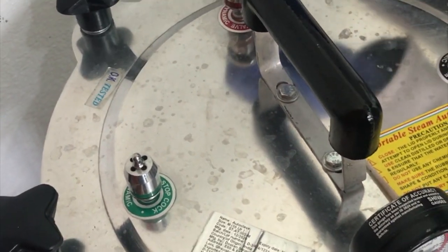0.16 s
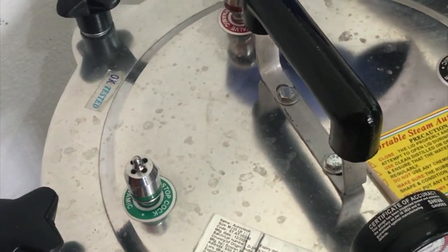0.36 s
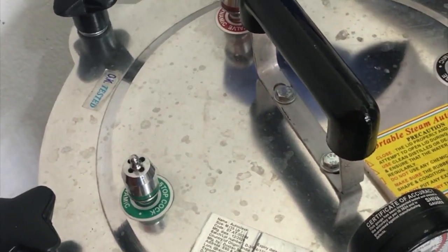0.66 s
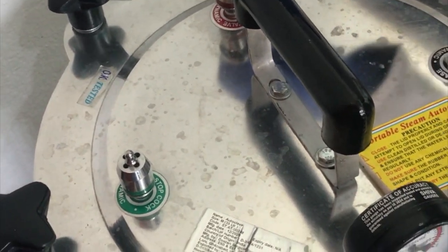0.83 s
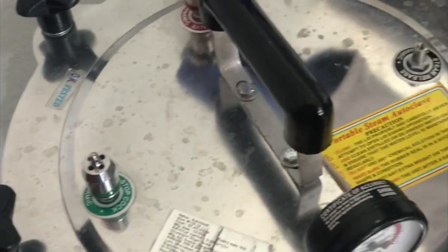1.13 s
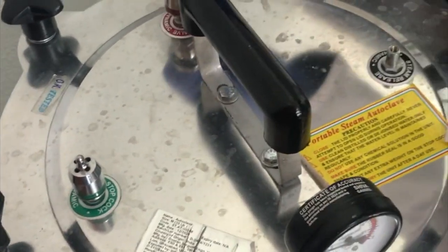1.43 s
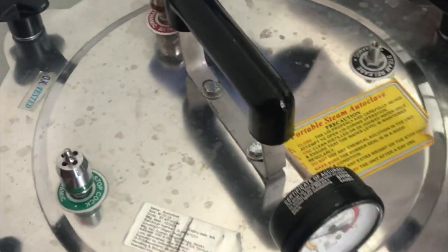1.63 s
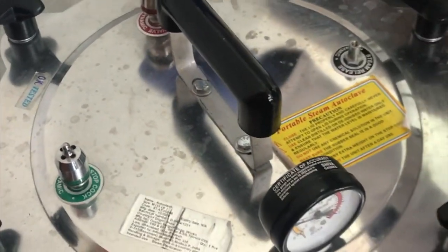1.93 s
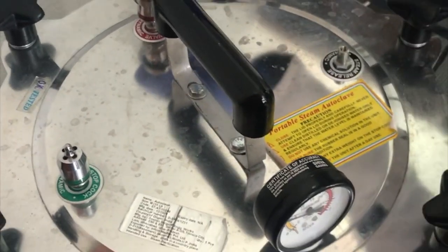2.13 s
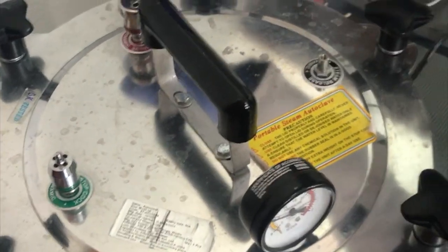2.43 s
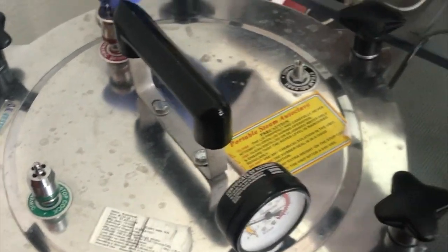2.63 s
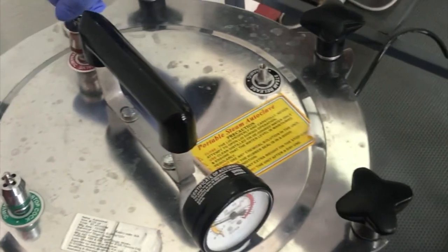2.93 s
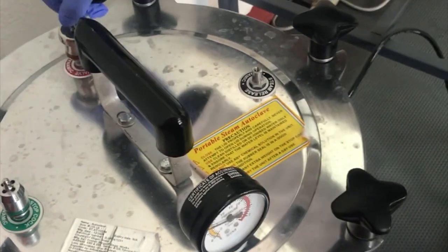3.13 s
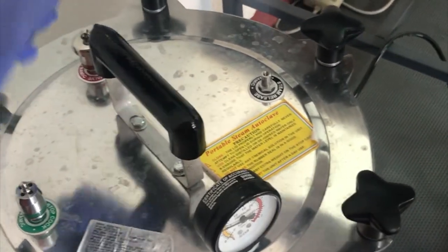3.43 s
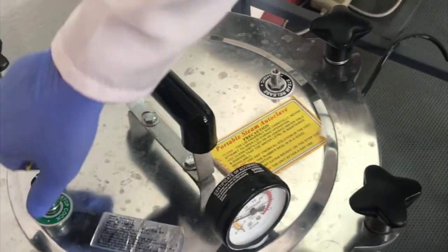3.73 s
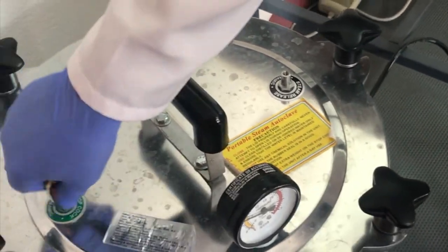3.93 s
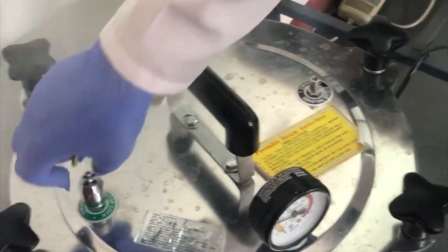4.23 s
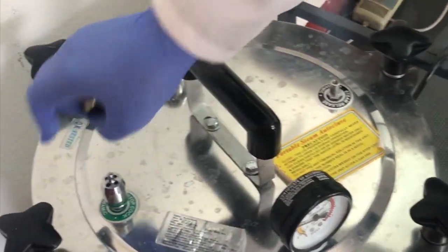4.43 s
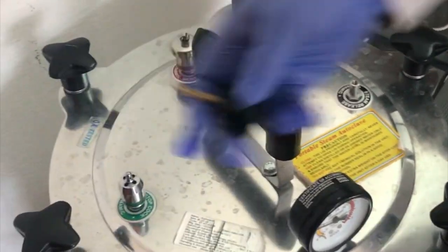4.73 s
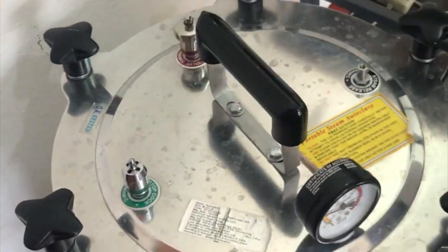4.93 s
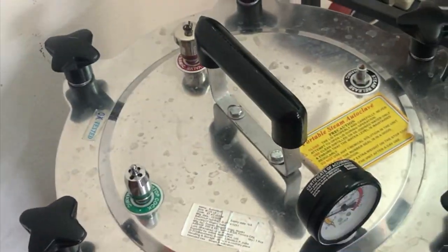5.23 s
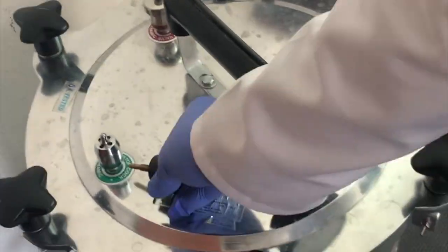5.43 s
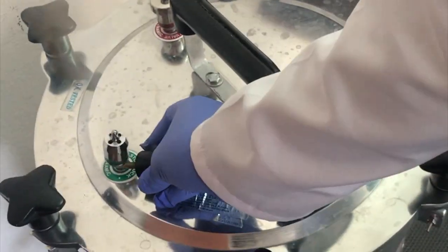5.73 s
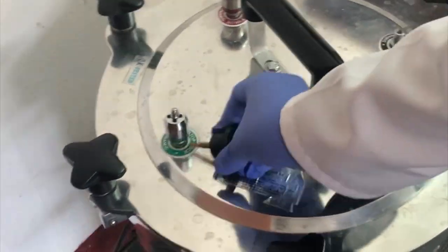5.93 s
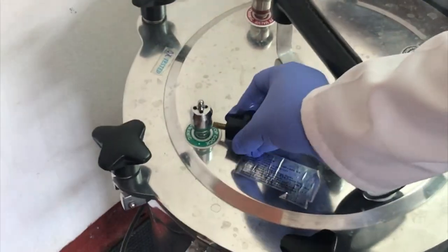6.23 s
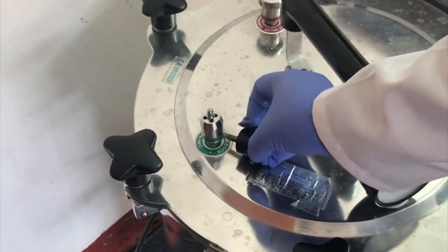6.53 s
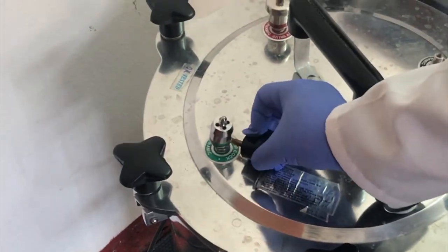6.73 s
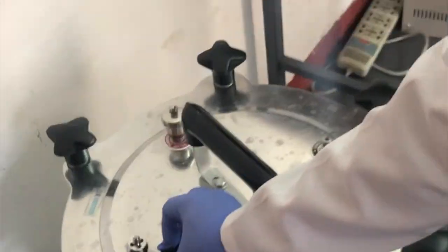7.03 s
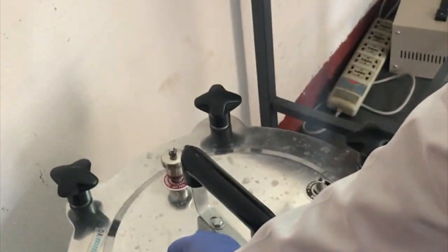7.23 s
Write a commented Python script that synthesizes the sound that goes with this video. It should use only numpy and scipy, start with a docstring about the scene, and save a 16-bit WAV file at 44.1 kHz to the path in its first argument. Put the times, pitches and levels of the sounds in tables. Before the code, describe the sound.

Steady high-pressure hiss, sharp and airy, dominates throughout, heard close and dry from one central point indoors. It is smooth at first, with faint whistling resonances. A short hollow metal knock comes before midway, then a weaker one; the hiss takes on shifting, phasey colours. In the second half tiny abrupt dropouts and spits roughen it, with brief creaks, scrapes and a glide in its whistling. It keeps hissing to the end.

```python
"""Steam valve in a small room

Close by, steam jets from a valve on the lid of a portable autoclave: shaped noise with faint gliding whistles.
A gloved hand works round the valves and recolours the hiss; drops of condensate choke it, mostly late on.
A metal key knocks and scrapes, setting decaying sines ringing; a stopcock creaks as a wavering sine.
The vessel's rumble and a soft rustle, both filtered noise, lie underneath. One microphone point, two equal channels.
"""
import sys
import numpy as np
from scipy import signal
from scipy.fft import rfft, irfft, next_fast_len
from scipy.io import wavfile
from scipy.ndimage import uniform_filter1d, map_coordinates

SR = 44100
rng = np.random.default_rng(int(sys.argv[2]) if len(sys.argv) > 2 else 0)


def digitize_waveform(pressure):
    """Quantize a signal to 16-bit integers and store it at the path in sys.argv[1].

    Rows of a 2-D input are taken as channels; values are limited to [-1, 1].
    """
    field = np.atleast_2d(pressure).T
    bounded = np.clip(field, -1, 1)
    quanta = np.round(bounded * 32767).astype(np.int16)
    wavfile.write(sys.argv[1], SR, quanta)


N = 325017
T = np.arange(N) / SR  # t/s of every sample
HZ = np.maximum(np.arange(N // 2 + 1) * SR / N, 1)  # f/Hz of every spectral bin

# Slow course of the hiss level: (t/s, level/dB)
HISS_LEVEL = [(0, -14.9), (1.5, -14.9), (2.6, -14.5), (3.5, -15.6), (4.1, -15.2), (4.7, -15.4),
              (5.95, -16.3), (6.5, -16.2), (7.37, -15.6)]
# Jet's low roar, shaded by the hand: (t/s, level/dB)
ROAR_LEVEL = [(0, -31.5), (1.3, -31.3), (1.8, -32.6), (3.28, -31.8), (3.5, -35.8), (3.97, -36), (4.1, -33),
              (4.45, -38), (5.35, -36), (5.57, -33), (6.2, -34), (7.37, -32.8)]
# Brief spurts and sags of the jet: (t/s at the middle, gain/dB)
SPURTS = [(1.0, 1.2), (1.17, 1), (1.29, -1), (1.49, 1.4), (1.63, -1), (2.62, 1), (3.55, -1.2), (4.27, -1),
          (4.9, 1.4), (5.57, 1.7), (5.89, -1.3), (6.11, 1.3), (6.65, 2.6), (7.22, 1.4)]
SPURT_HALF_S = 0.04
# Spectrum of the bare jet: (f/Hz, relative level/dB per Hz)
JET_SPECTRUM = [(100, -50), (300, -34.5), (500, -31), (800, -23), (1150, -17), (1600, -14.5), (2400, -10.5),
                (3300, -7.5), (4400, -4), (6200, 1), (7600, -4), (9300, 0.16), (10400, -4), (11400, -0.5),
                (15600, -2.77)]
# Peaks and notches from reflections round the valve, one table per pose of the hand: (f/Hz, width/Hz, gain/dB)
BARE_LID = [(2050, 110, -2.4), (2860, 280, -2.5), (3740, 130, -1.5), (4630, 210, 5), (4830, 400, -4.0),
            (5900, 330, -3), (6720, 220, -2.0), (12420, 1500, -0.5), (16800, 1900, -8)]
HAND_OVER_VALVE = [(3050, 120, -3), (3320, 170, 2.5), (4620, 130, 5), (6730, 150, -2), (7840, 520, -2.5),
                   (11000, 350, 4), (13900, 260, 6)]
HAND_LIFTED = [(950, 340, -3.5), (2230, 230, 4.5), (3050, 2000, -2.5), (4100, 270, 5.2), (5050, 160, -2),
               (7440, 1070, -3.0), (9000, 810, -4), (13950, 260, 3.6)]
ARM_ACROSS = [(2210, 270, 3), (3060, 280, -2), (4080, 220, 3), (4980, 160, -3), (10700, 2700, -2.2)]
KEY_TURNING = [(1090, 130, 2.5), (1500, 580, -2), (3036, 900, 1.5), (5050, 600, -3), (5900, 260, 3),
               (7800, 220, 3), (8600, 260, 2), (10500, 960, -3), (13630, 300, 3)]
POSES = [BARE_LID, HAND_OVER_VALVE, HAND_LIFTED, ARM_ACROSS, KEY_TURNING]
# Middle of each change of pose: (t/s)
POSE_CHANGES = [3.3, 4.25, 5.42, 6.091]
POSE_CHANGE_LENGTH_S = 0.12
# Bounce of the hiss off the moving hand: (t/s, delay/s, strength 0-1)
HAND_ECHO = [(2.2, 0.0014, 0.06), (4.2, .00125, 0.11), (5.4, 0.0012, 0.04), (6.0, .001, 0)]
# Valve's main resonance, retuned by the hand: (t/s, f/Hz, level/dB before the whistles' common gain)
VALVE_TONE = [(0, 6330, -38), (0.85, 6320, -37), (1.2, 6300, -28.5), (1.8, 6330, -36), (3.3, 6200, -39),
              (4.0, 6500, -35), (4.6, 6050, -31), (5.85, 5550, -30), (6.02, 5250, -27.5),
              (6.15, 5800, -27.5), (6.5, 6060, -26.5), (6.9, 6000, -35), (7.37, 6150, -33)]
# Faint resonances of gaps between glove, valve and lid; those of one gap glide together as the hand travels:
# (start t/s, end t/s, glide/share of pitch per s, [(f/Hz half-way, level/dB before the common gain)])
GAP_TONES = [(0, 2.2, 0.0, [(1160, -49), (2280, -45.5), (4200, -39), (9400, -36), (13550, -33),
             (14900, -32)]), (2.15, 3.35, 0.02, [(1350, -47), (5250, -36), (9500, -31), (14800, -33)]),
             (3.4, 4.25, 0.06, [(1980, -47), (5420, -31), (6900, -31.5), (14700, -28)]),
             (4.3, 5.45, -0.022, [(5330, -34), (11700, -31), (14000, -28.5), (14800, -28.5)]),
             (5.42, 5.95, 0.0, [(8100, -34), (10000, -36), (12800, -32), (14600, -31)]),
             (5.85, 6.17, 0.6, [(4600, -30), (7000, -31), (9100, -32), (12500, -29)]),
             (6.1, 7.5, 0.015, [(8700, -35), (12950, -30.5), (14500, -31)])]
# Drops choking the orifice: (t/s when blown clear, depth/dB)
DROPS = [(2.717, -3.5), (3.562, -3.5), (4.947, -3), (5.119, -4), (5.437, -10), (5.509, -12), (5.806, -8),
         (6.055, -12), (6.085, -6), (6.43, -17), (7.051, -14), (7.294, -12)]
DROP_CLOSING_S = 0.0063
# Key knocking and dragging on the lid: (start t/s, level/dB at the start, length/s)
SCRAPES = [(1.125, -44, 0.047), (3.295, -36.5, 0.15), (4.0, -50, 0.19), (4.259, -39.5, 0.11),
           (5.554, -43.5, 0.05), (5.908, -41, 0.03), (6.372, -41, 0.033), (6.618, -49, .04),
           (7.299, -44, 0.045)]
# Ringing modes of the lid: (f/Hz, relative level/dB, t60/s)
LID_MODES = [(72, -20, .15), (189, -7, 0.18), (234, -9, 0.15), (350, -21, .08), (478, -2.5, 0.081),
             (540, -11, 0.1), (633, -2, 0.066), (785, -1.5, .05), (880, -9, .05), (1143, 1.5, 0.08),
             (1320, -8, .05), (1860, 1.5, 0.033), (1988, 4.5, 0.066), (2400, -4, .06)]
# Key clinking on a valve: (t/s, strength of the blow/dB)
CLINKS = [(3.2932, -20.5), (4.262, -37)]
# Ringing modes of the key: (f/Hz, level/dB relative to the blow, t60/s)
KEY_MODES = [(1376, 2, 0.049), (1980, -7, .06), (2390, -0.5, 0.043), (2700, -6, .04)]
# Stopcock creaking as it turns: (t/s at the middle, level/dB, half length/s)
CREAKS = [(5.944, -33, .009), (6.115, -44, .02), (6.389, -33, 0.017), (6.63, -42, .012)]
CREAK_HZ, CREAK_WIDTH_HZ = 1138, 60
# Rumble of the vessel: (t/s, level/dB)
RUMBLE_LEVEL = [(0, -59.5), (1.2, -66), (2.7, -64.5), (3.3, -61), (4.1, -61), (4.3, -56), (4.65, -59),
                (5.0, -69), (5.8, -70), (6.05, -58), (6.5, -71), (7.37, -74)]
RUMBLE_HZ, RUMBLE_WIDTH_HZ = 65.3, 12
# Room noise and the rub of glove and sleeve: (t/s, level/dB)
RUSTLE_LEVEL = [(0, -59), (3.2, -60.5), (3.45, -57), (3.85, -59), (4.25, -55), (4.75, -62.5), (5.1, -61.5),
                (5.5, -54.5), (7.37, -55)]
# Spectrum of that rustle: (f/Hz, relative level/dB per Hz)
RUSTLE_SPECTRUM = [(20, -8), (45, -3.5), (90, -0.5), (180, 0.5), (320, -3), (550, -6), (1000, -22),
                   (3000, -50)]
CUTOFF_HZ = 15800


def steam(split_hz=3000, flutter_db=0.55, roar_flutter_db=0.3):
    """Turbulent hiss and roar, coloured by the pose of the hand and interrupted by water."""
    low_share = 1 / (1 + (HZ / split_hz) ** 12)  # share of power given to the roar
    moves = [np.clip((T - t) / POSE_CHANGE_LENGTH_S + 0.5, 0, 1) for t in POSE_CHANGES]
    passed = [1] + moves + [0]
    hiss = roar = 0
    for k, pose in enumerate(POSES):
        share = np.sqrt(np.maximum(passed[k] - passed[k + 1], 0))  # crossfade at equal power
        gain = spectrum(JET_SPECTRUM) * reflections(pose, ripple=0.062, longest_s=0.012)
        hiss = hiss + share * noise(gain * np.sqrt(1 - low_share))
        roar = roar + share * noise(gain * np.sqrt(low_share))
    flow = flow_db()
    brief_flow = flow - uniform_filter1d(flow, SR)  # the roar follows only changes shorter than about 1 s
    hiss = hiss * from_db(flow)
    roar = roar * from_db(in_time(ROAR_LEVEL) + brief_flow + roar_flutter_db * drift(20))
    water_db = choking_db(DROPS, DROP_CLOSING_S, clear_s=0.00059)
    water_db += spitting_db(count=400, dry_db=0.0, wet_db=5.0, closing_s=0.0045)
    jet = hand_echo(hiss + roar) + whistles()
    return jet * from_db(water_db + flutter_db * drift(33))


def flow_db(wander_db=0.1):
    """The jet's level: a slow course, a gentle wander, brief spurts and sags."""
    spurts = sum(db * np.exp(-((T - t) / SPURT_HALF_S) ** 2) for t, db in SPURTS)
    return in_time(HISS_LEVEL) + wander_db * drift(6) + spurts


def reflections(peaks, ripple, longest_s):
    """Broad peaks and notches of one pose, finely rippled by faint echoes from lid and walls."""
    broad_db = sum(db * np.exp(-2 * ((HZ - hz) / width) ** 2) for hz, width, db in peaks)
    paths = np.zeros(N)
    paths[0] = 1  # direct sound
    lags = (rng.uniform(0.15, 1, 10) * longest_s * SR).astype(int)
    paths[lags] += ripple * rng.choice([-1, 1], 10)
    return from_db(broad_db) * np.abs(rfft(paths))


def hand_echo(jet):
    """A short echo of changing delay sweeps a comb through the hiss."""
    t, delay, strength = np.transpose(HAND_ECHO)
    late = map_coordinates(jet, [(T - np.interp(T, t, delay)) * SR], order=3)
    return jet + np.interp(T, t, strength) * late


def whistles(width_hz=200, fade_s=0.1, level_db=0.6, waver=0.003, flicker_db=0.8):
    """Each resonance is a narrow band of turbulence that swells, glides, wavers and fades."""
    turbulence = narrow(0, width_hz) + 1j * narrow(0, width_hz)
    unrest = drift(6)

    def sing(start, end, hz, db):
        """One resonance: turbulence shifted up to its pitch, from start to end."""
        near = slice(*np.searchsorted(T, [start, end]))
        # random offsets give each resonance its own stretch of the shared noise
        band, bend, flicker = (np.roll(v, rng.integers(N)) for v in (turbulence, unrest, unrest))
        pitch = hz * (1 + waver * bend)
        phase = 2 * np.pi * np.cumsum(pitch[near]) / SR
        swell = np.clip(np.minimum(T[near] - start, end - T[near]) / fade_s, 0, 1)
        level = from_db((db + flicker_db * flicker)[near])
        note = np.zeros(N)
        note[near] = swell * level * (band[near] * np.exp(1j * phase)).real
        return note

    t, hz, db = np.transpose(VALVE_TONE)
    out = sing(0, T[-1], np.interp(T, t, hz), np.interp(T, t, db))
    for start, end, glide, resonances in GAP_TONES:
        stretch = 1 + glide * (T - (start + end) / 2)
        out += sum(sing(start, end, hz * stretch, db) for hz, db in resonances)
    return from_db(level_db) * out


def choking_db(drops, closing_s, clear_s):
    """Each drop closes the orifice gradually and is blown clear far faster."""
    out = np.zeros(N)
    for t, depth_db in drops:
        near = slice(*np.searchsorted(T, [t - 4 * closing_s, t + 4 * clear_s]))
        since = T[near] - t + clear_s  # from the deepest point
        pace = np.where(since < 0, closing_s, clear_s)
        out[near] += depth_db * np.exp(-(since / pace) ** 2)
    return out


def spitting_db(count, dry_db, wet_db, closing_s):
    """Droplets too small to stop the jet make it stutter, more so as the steam gets wetter."""
    chance = rng.random((count, 2))
    t = chance[:, 0] * T[-1]
    largest_db = np.interp(t, [4.4, 5.6], [dry_db, wet_db])
    depth_db = -largest_db * chance[:, 1] ** 2
    dips = choking_db(zip(t, depth_db), closing_s, clear_s=0.0014)
    return dips - uniform_filter1d(dips, SR // 4)  # keeps the average level


def scrapes(slips_per_s=700, fade_db=-4.0, release_s=0.035):
    """The key sticks and slips at random, and every slip rings the lid's modes."""
    push = np.zeros(N)
    for t, db, length in SCRAPES:
        since = np.maximum(T - t, 0)
        release = np.exp(-np.maximum(since - length, 0) / release_s)
        push += (T >= t) * from_db(db + fade_db * since / length) * release
    slips = rng.random(N) < slips_per_s / SR
    out = sum(from_db(db) * ring(slips * push * rng.standard_normal(N), hz, t60) for hz, db, t60 in LID_MODES)
    # expected power of the ringing at unit push
    power = slips_per_s * sum(from_db(2 * db) * t60 for hz, db, t60 in LID_MODES) / (4 * np.log(1000))
    return out / np.sqrt(power)


def clinks():
    """Single short blows ring the modes of the hand-damped key."""
    clicks = np.zeros(N)
    for t, db in CLINKS:
        clicks[round(t * SR)] = from_db(db)
    return sum(from_db(db) * ring(clicks, hz, t60) for hz, db, t60 in KEY_MODES)


def creaks():
    """Friction in the stopcock swells briefly into a rough, wavering note."""
    swell = sum(from_db(db) * np.exp(-((T - t) / half) ** 2) for t, db, half in CREAKS)
    pitch = CREAK_HZ + CREAK_WIDTH_HZ * drift(197)
    return swell * np.sqrt(2) * np.sin(2 * np.pi * np.cumsum(pitch) / SR)


def rumble():
    """The vessel's low rumble is noise gathered round one resonance."""
    return from_db(in_time(RUMBLE_LEVEL)) * narrow(RUMBLE_HZ, RUMBLE_WIDTH_HZ)


def rustle(flutter_db=1.1):
    """Room noise and rubbing cloth: dull noise of fluttering level."""
    level_db = in_time(RUSTLE_LEVEL) + flutter_db * drift(10)
    return from_db(level_db) * noise(spectrum(RUSTLE_SPECTRUM))


def from_db(db):
    """Decibels to gain."""
    return 10 ** (np.asarray(db) / 20)


def rms_one(x):
    """Scale to unit rms."""
    return x / np.sqrt(np.mean(x ** 2) + 1e-20)


def in_time(rows):
    """A curve of (t/s, value) at every sample."""
    return np.interp(T, *np.transpose(rows))


def spectrum(points):
    """A spectrum of (f/Hz, level/dB) as a gain at every frequency."""
    hz, db = np.transpose(points)
    return from_db(np.interp(np.log(HZ), np.log(hz), db))


def noise(gain):
    """Noise with the given gain by frequency; rms 1."""
    size = next_fast_len(N)
    gain = np.interp(np.arange(size // 2 + 1) * SR / size, HZ, gain)
    return rms_one(irfft(rfft(rng.standard_normal(size)) * gain, size)[:N])


def drift(rate):
    """Slow random wander with about this many turns a second; rms 1."""
    return noise(1 / (1 + (HZ / rate) ** 2))


def narrow(hz, width_hz):
    """Noise gathered round one frequency; rms 1."""
    return noise(1 / (1 + ((HZ - hz) / width_hz) ** 2))


def ring(clicks, hz, t60):
    """A unit click sets a decaying sine of initial height 1 ringing."""
    r = from_db(-60 / (t60 * SR))  # decay per sample
    w = 2 * np.pi * hz / SR
    return signal.lfilter([0, np.sin(w)], [1, -2 * r * np.cos(w), r * r], clicks + 1e-18)


def scene():
    """Everything is heard from one point, alike in both channels."""
    mono = steam() + scrapes() + clinks() + creaks() + rumble() + rustle()
    return np.tile(mono, (2, 1))


def record(dry):
    """The top is cut steeply by an elliptic low-pass."""
    return signal.sosfilt(signal.ellip(12, 0.1, 80, CUTOFF_HZ, fs=SR, output="sos"), dry)


dry = scene()
out = record(dry)
digitize_waveform(out)
```